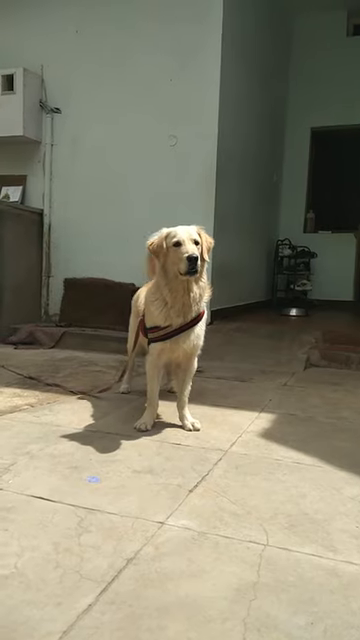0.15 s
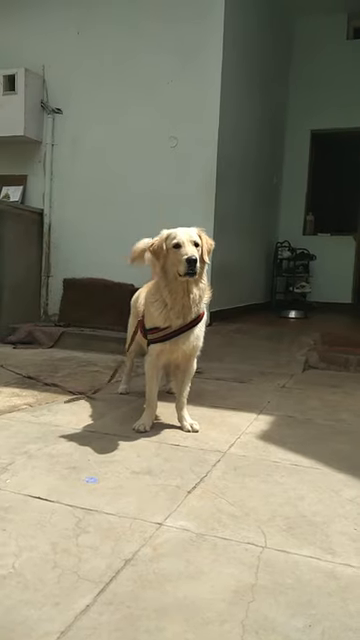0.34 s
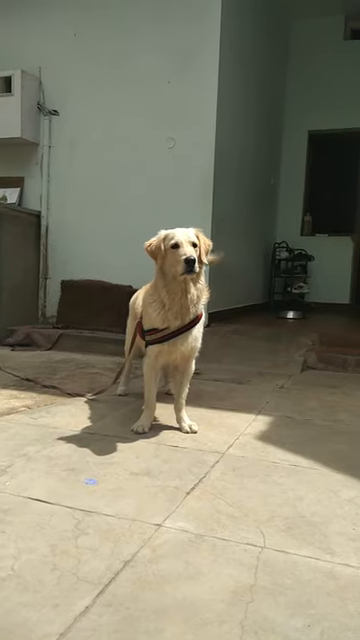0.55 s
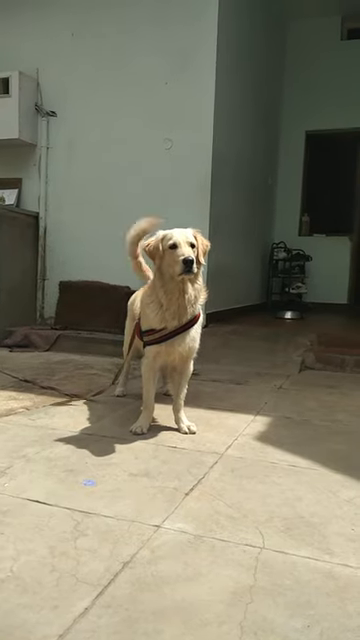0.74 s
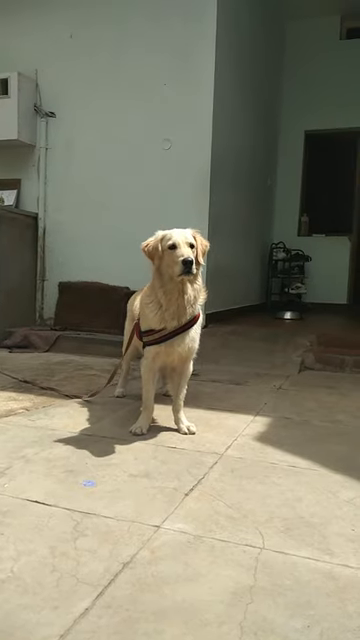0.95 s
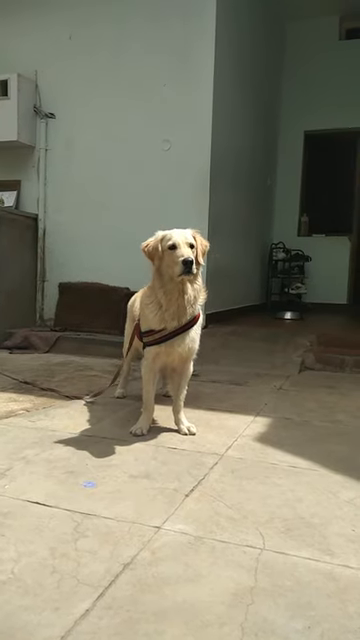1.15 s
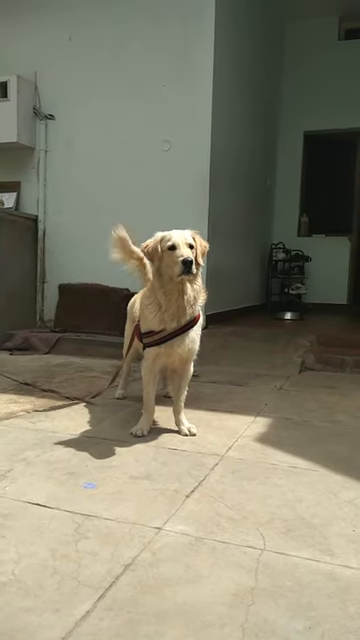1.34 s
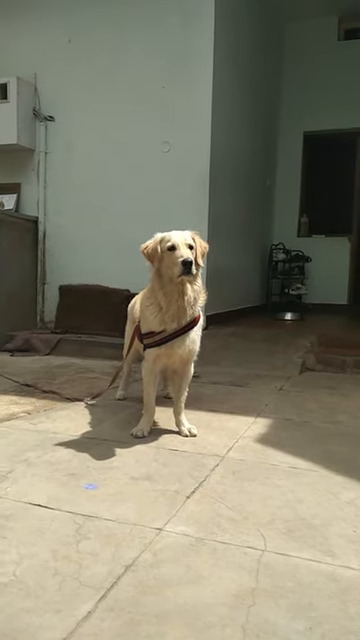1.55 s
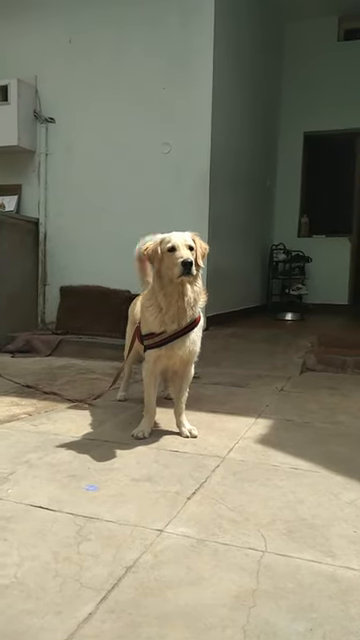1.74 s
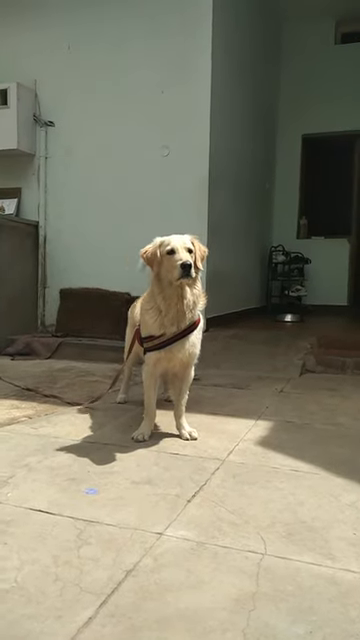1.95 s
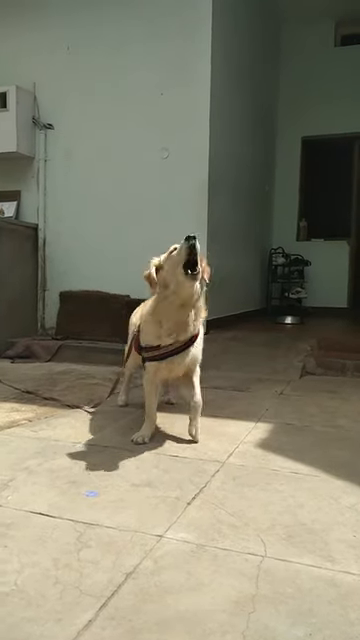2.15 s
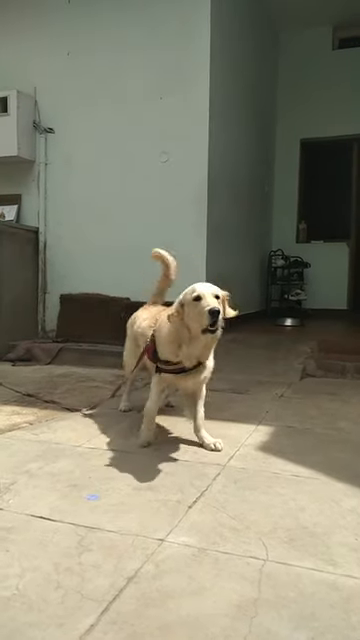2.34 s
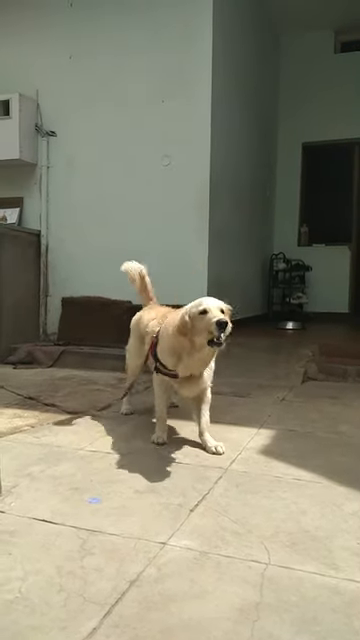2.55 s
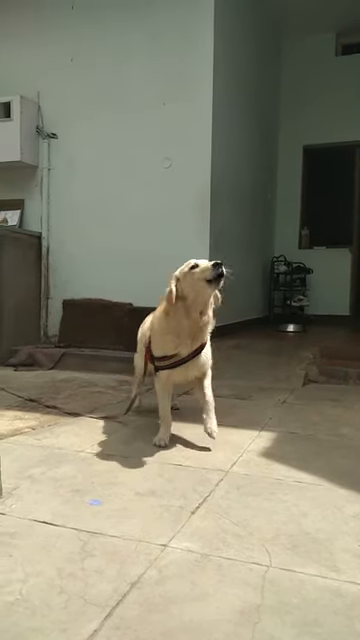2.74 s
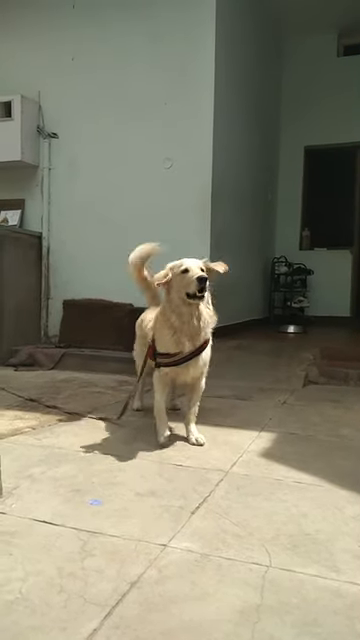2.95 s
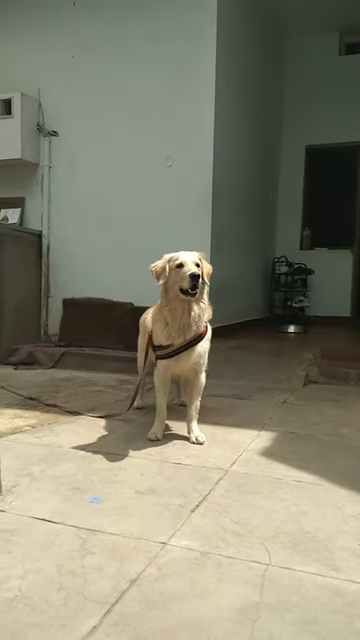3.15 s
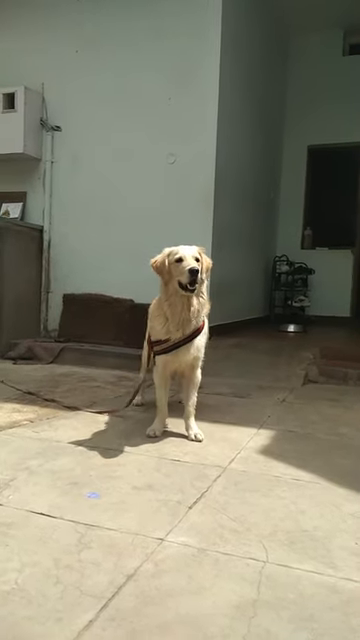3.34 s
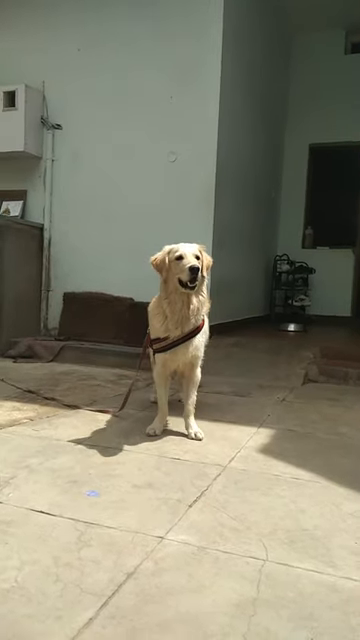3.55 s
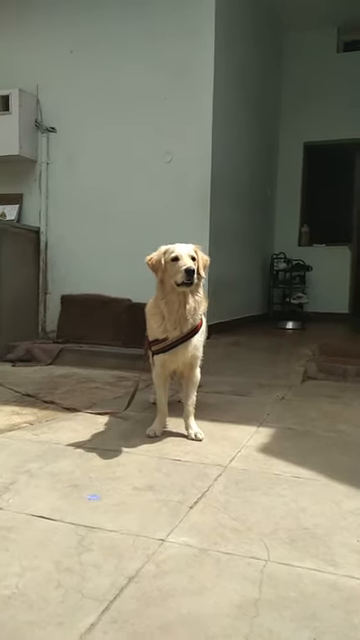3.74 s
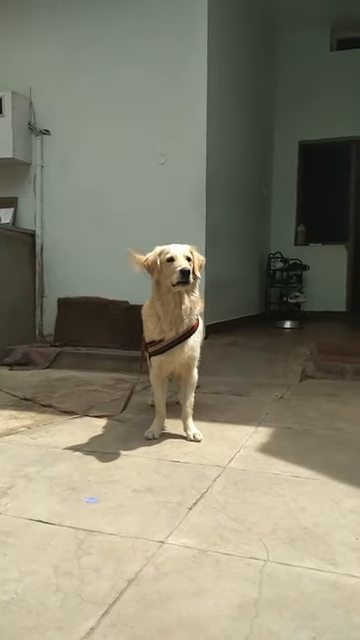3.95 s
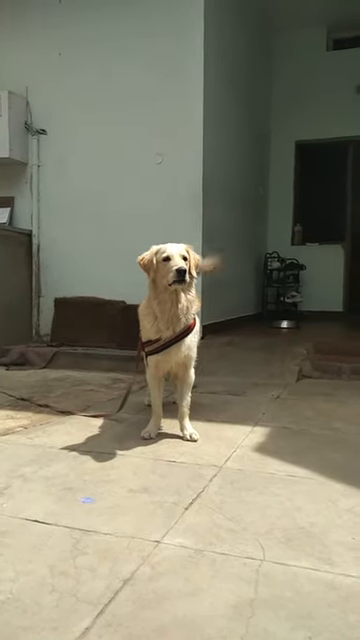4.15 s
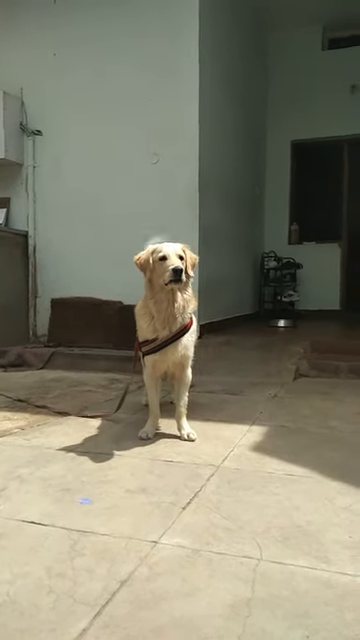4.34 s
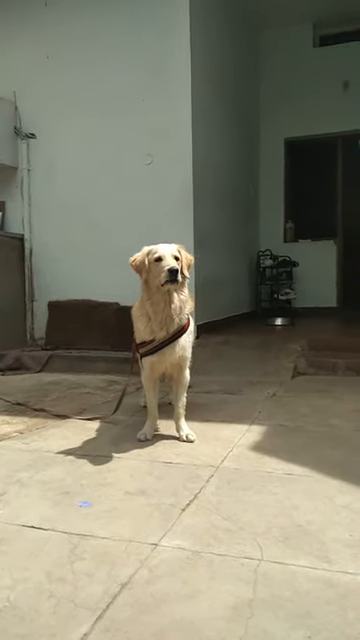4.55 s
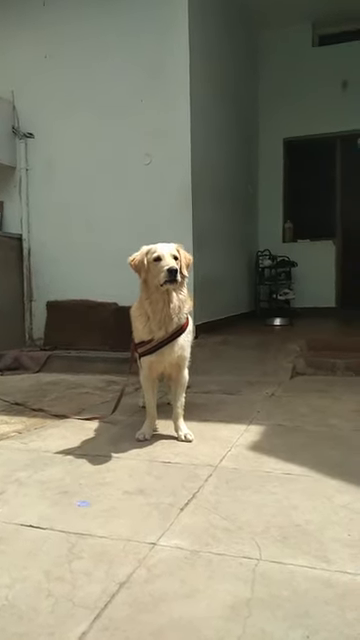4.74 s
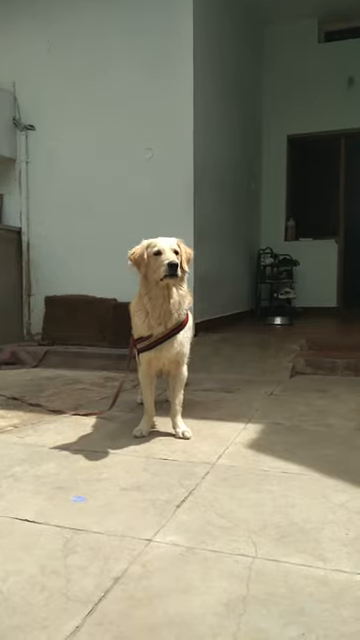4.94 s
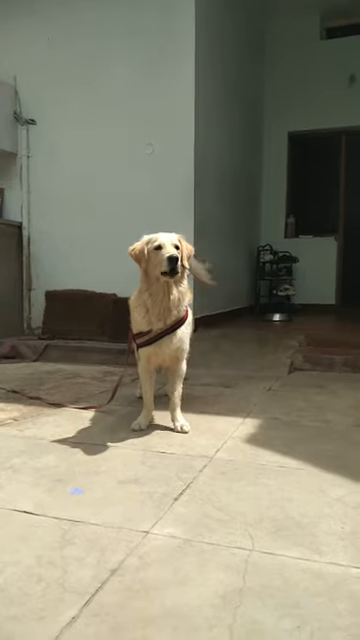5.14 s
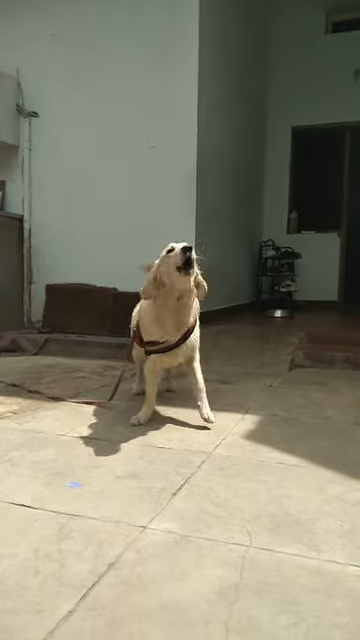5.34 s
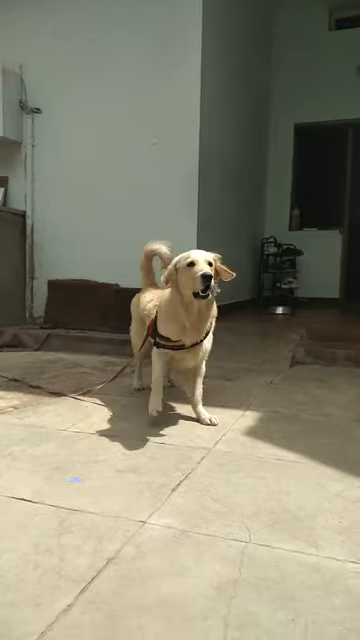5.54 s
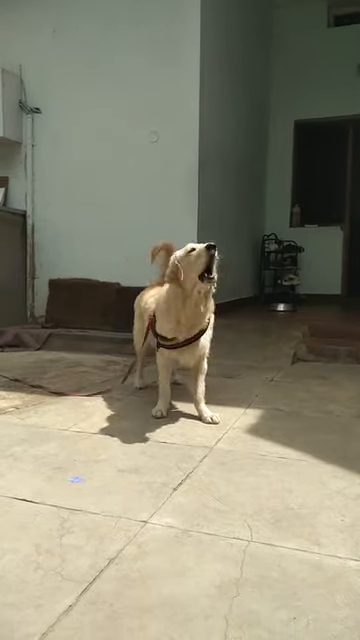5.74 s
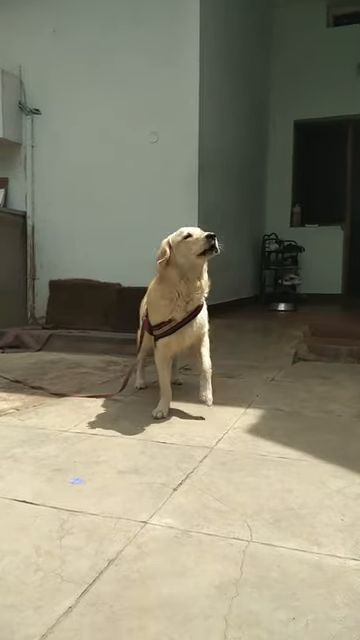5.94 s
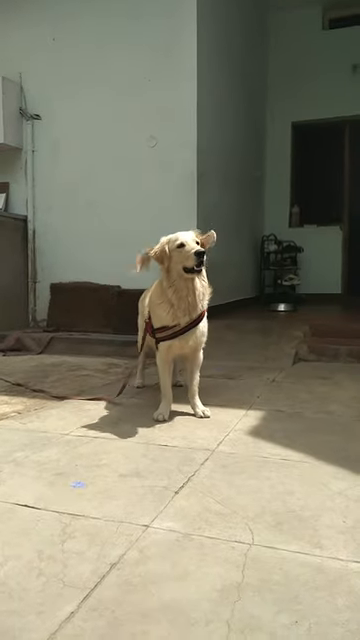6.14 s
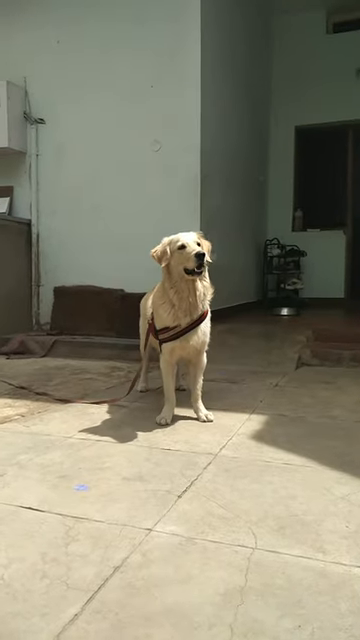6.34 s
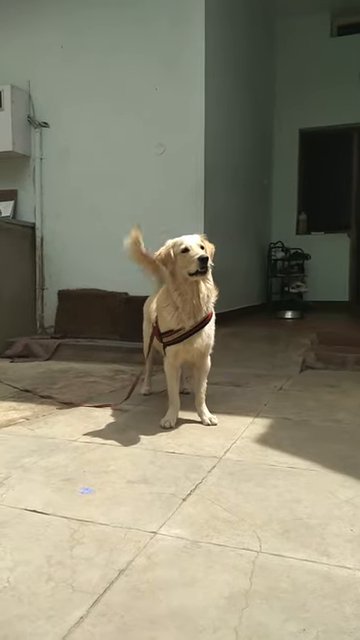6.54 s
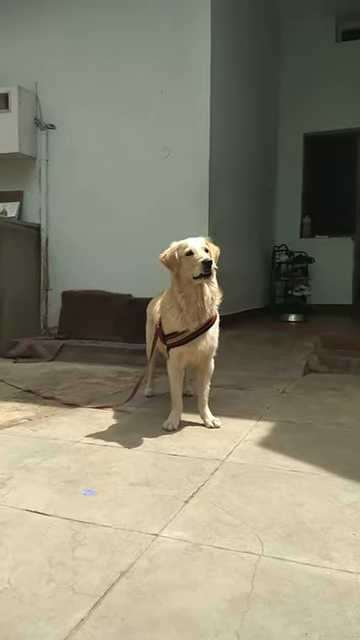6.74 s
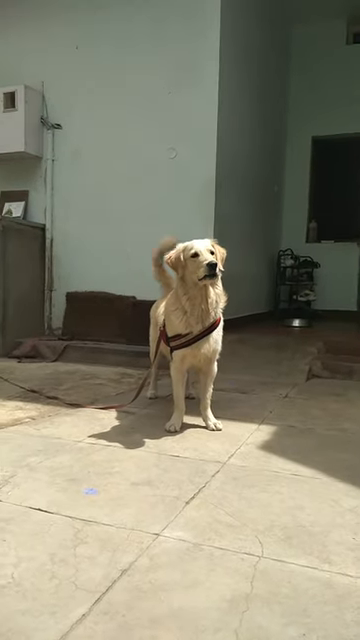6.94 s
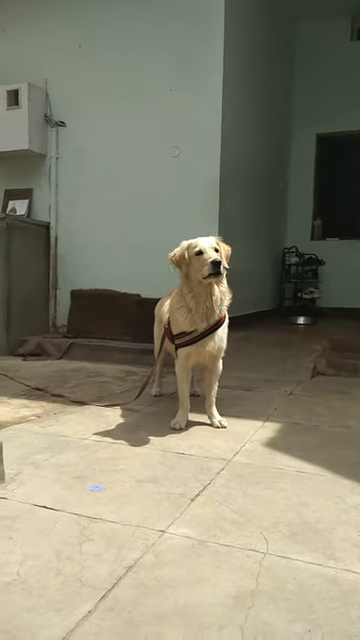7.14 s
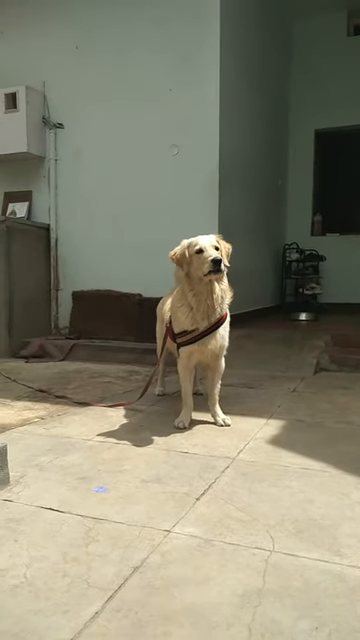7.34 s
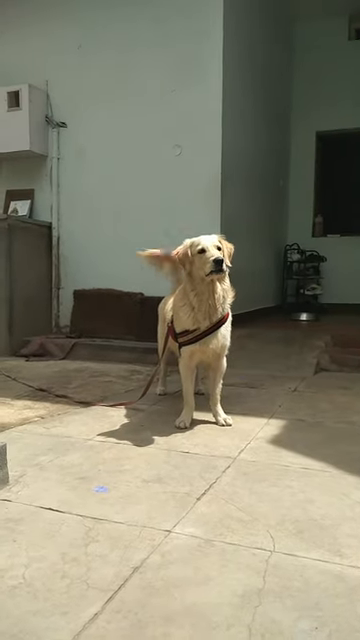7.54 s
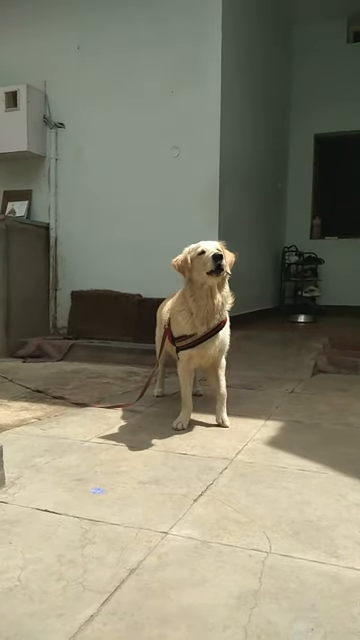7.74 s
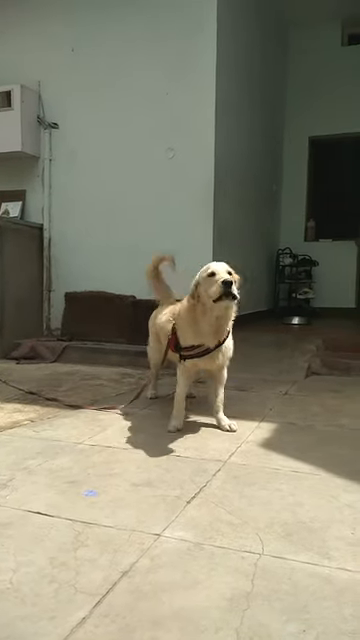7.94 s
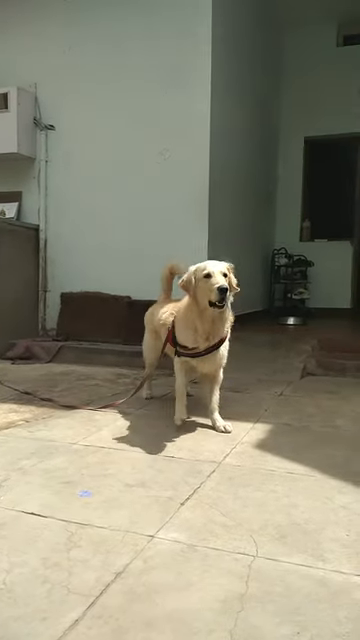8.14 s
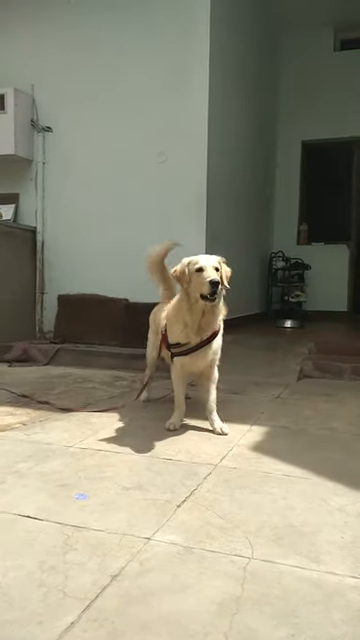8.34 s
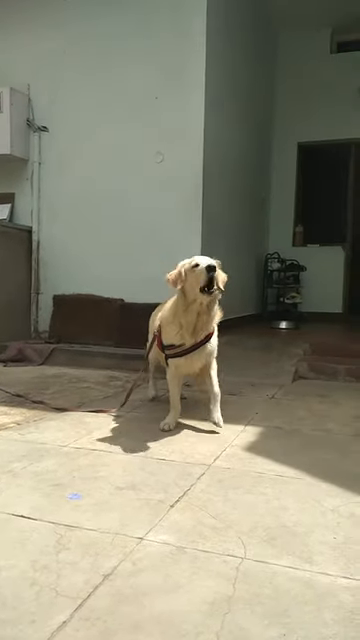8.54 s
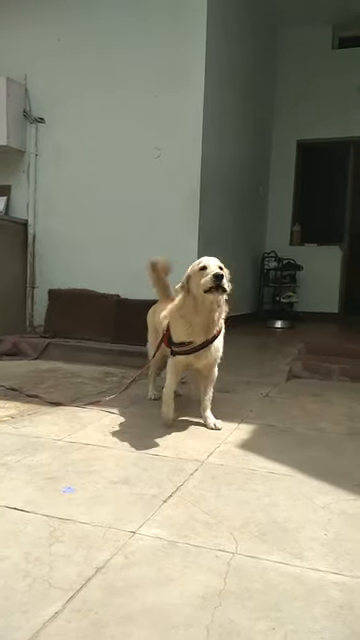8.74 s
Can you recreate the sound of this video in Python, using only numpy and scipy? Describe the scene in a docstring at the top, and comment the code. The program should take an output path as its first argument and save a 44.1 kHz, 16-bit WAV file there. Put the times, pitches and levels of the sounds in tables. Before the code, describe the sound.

Near silence with faint air and distant bird notes, then sudden loud, raspy barks from a big dog: three pairs, the last pair more widely spaced. Each is short, rising in pitch then dropping, followed by hard-wall slap and a fading tail. Breathy nose puffs fill gaps; background air swells slightly near the end. Wide stereo outdoor pickup from a few metres away.

```python
"""Dog barking in a walled courtyard

A large dog a few metres from the microphone barks six times: rough vocal-fold pulses ring its throat.
Between barks it snuffs (noise through nose resonances) and whines thinly (gliding near sines).
Farther off a bird whistles, with soft swishes and a ringing hiss, over low rumble and a wash of air.
Walls add echoes and a tail; the loudest barks just reach the recorder's limiter."""
import sys
import numpy as np
from scipy import signal
from scipy.fft import rfft, irfft, next_fast_len
from scipy.io import wavfile
from scipy.ndimage import uniform_filter1d, minimum_filter1d

SR = 44100
rng = np.random.default_rng(int(sys.argv[2]) if len(sys.argv) > 2 else 0)


def inscribe(sig):
    """Save sig as 16-bit PCM at rate SR to the path in sys.argv[1].

    A 1-D sig is mono; a 2-D sig holds one channel per row.
    Samples are clipped to [-1, 1] before scaling.
    """
    pcm = np.round(np.clip(np.atleast_2d(sig).T, -1, 1) * 32767)
    wavfile.write(sys.argv[1], SR, pcm.astype(np.int16))


N = 387198
TIME = np.arange(N) / SR   # seconds

# every bark starts as a murmur, bursts out, then swells to full level (dB against full level)
MURMUR_DB, BURST_DB, SWELL_S = -33, -9, 0.025
RELEASE_DB_PER_S, RELEASE_S = 431, 0.085
CATCH_SHARE, CATCH_S = 0.75, 0.029   # where in the push the dip comes, and its half width
JAW_SHUT_S = 0.0047   # how quickly the jaw closes
RASP_ONSET_DB, RASP_FADE_DB_PER_S = 5, 76   # the rasp is strongest at the start
RASP_FLICKER_DB = 3   # extra flutter of the resonances that carry the rasp
CLIMB_CURVE = 1.7   # how much the pitch climb flattens towards the end of the push


def bark_gesture(t, attack, length, level_db, first_hz, top_hz, sag, opening, shut_s, rasp_db, dip_db):
    """One push of air: pitch climbs, then sags as the level falls. Gives pitch, level, jaw and rasp."""
    after = np.maximum(t - length, 0)
    climb = 1 - (1 - np.minimum(t / length, 1)) ** CLIMB_CURVE
    pitch = first_hz + (top_hz - first_hz) * climb - sag * after
    burst = (MURMUR_DB - BURST_DB) * (1 - np.minimum(t / attack, 1) ** 2)
    swell = BURST_DB * np.clip(1 - (t - attack) / SWELL_S, 0, 1)
    # the level dips once as the throat catches
    catch = np.exp(-((t - CATCH_SHARE * length) / CATCH_S) ** 2)
    level = level_db + burst + swell - dip_db * catch - RELEASE_DB_PER_S * after
    jaw = opening * .5 * (1 - np.tanh((t - shut_s) / JAW_SHUT_S))
    rasp = rasp_db + RASP_ONSET_DB - RASP_FADE_DB_PER_S * t
    return np.maximum(pitch, first_hz / 2), level, jaw, rasp


# throat and mouth resonances, two passes each: centre_hz, width_hz (per pass), jaw_shut_db,
# jaw_open_db (added in proportion to the opening), rasp_share
THROAT_RESONANCES = [(507.4, 170, 13, -20, 0.12), (805, 200, -6.5, 10, 0.017),
                     (1288, 120, -16, 12.5, 0.039), (1653, 340, -24.5, 7.5, 1), (2205, 260, -25, 3, 0.97),
                     (2824, 820, -28, 1.5, 0), (4080, 820, -30, -0.5, 0.0021), (5064, 710, -27, -2, 1),
                     (6310, 980, -25.5, 2, 0.33)]


def throat(source, jaw, rasp_db, patchy_db=3.0):
    """Throat and mouth ring to the source; an opening jaw shifts weight between the resonances."""
    voice = 0
    for k, (hz, width, shut_db, open_db, share) in enumerate(THROAT_RESONANCES):
        ringing = steady(resonate_twice(source, hz, width), size=800)
        flutter_db = (patchy_db + share * RASP_FLICKER_DB) * wobble(90, len(source))
        gain = from_db(shut_db + open_db * jaw + share * rasp_db + flutter_db)
        voice = voice + (-1) ** k * ringing * gain
    return voice


def bark(row, low_hz=300, core_db=-5.0, chest_db=-35, chest_hz=190):
    """Uneven vocal-fold pulses and pulsed turbulence ring the throat, with a clear core and a chest thud."""
    start, attack, length = row[:3]
    at = span(start, start + length + RELEASE_S)
    size = len(at)
    pitch, level_db, jaw, rasp_db = bark_gesture(TIME[at] - start, *row[1:])
    rough = from_db(np.clip(rasp_db, -6, 6) / 2)   # a pressed voice is also less regular
    jitter = .028 * wobble(120, size) + .022 * rough * wobble(400, size)
    cycles = np.cumsum(pitch * (1 + jitter)) / SR
    closures = np.diff(np.floor(cycles), prepend=0) * np.sqrt(SR / pitch)
    # strong and weak pulses alternate, which puts half lines between the harmonics
    alternation = .27 * np.cos(np.pi * np.floor(cycles))
    pulses = closures * (1 + rough * (.3 * wobble(400, size) + alternation))
    turbulence = rms_one(rng.standard_normal(size) * (1 + 0.53 * np.cos(2 * np.pi * cycles)))
    source = pulses + .36 * rough * turbulence + .5 * cut(turbulence, 2600, "high")
    voice = steady(throat(source, jaw, rasp_db), size=400)
    # the clear core of the voice: the fundamental with the jaw shut, the octave with it open
    core = (1 - jaw) ** 3 * np.sin(2 * np.pi * cycles) + jaw ** 2 * np.sin(4 * np.pi * cycles)
    core = core * from_db(3 * wobble(170, size)) / rough
    voice = cut(voice + from_db(core_db) * core, low_hz, "high", order=4)
    # the chest adds a weak low thud
    voice = voice + from_db(chest_db) * rms_one(resonate_twice(turbulence, chest_hz, 180))
    out = np.zeros(N)
    out[at] = steady(voice, size=400) * from_db(level_db)
    return out


# six barks: start_s, attack_s, push_s (length of the push), level_db (before placing), first_pitch_hz,
# top_pitch_hz (before the sag), sag_hz_per_s (after the push), jaw_opening (0-1),
# jaw_shuts_s (after the start), rasp_db (before its onset and fade), dip_db (late in the push)
BARK_EVENTS = [(2.216, 0.023, .135, -7, 205.1, 480.9, 250, 0.6, .095, 1.5, 2.5),
               (2.714, 0.018, .13, -6.5, 214.8, 470.3, 608, .62, 0.13, 3.5, 8),
               (5.346, .022, 0.085, -3, 269.3, 398.5, 1496, .75, .11, 3, 5.5),
               (5.853, 0.019, .117, -7, 256.5, 374.2, 1800, .68, 0.16, 5, 7.5),
               (7.868, .025, .106, -7, 269.2, 413.6, 2000, 0.8, .118, 1.5, 5.5),
               (8.656, 0.03, 0.11, -9.5, 254, 383.7, 1500, .58, 0.18, 3.5, 2.5)]


def barks():
    """The dog's six pushes of voice, dry."""
    return sum(bark(row) for row in BARK_EVENTS)


# nose and throat resonances in a snuff, two passes each: centre_hz, width_hz (per pass), level_db,
# throat_share (of the throatiness)
NOSE_RESONANCES = [(457, 250, -14.5, 0.94), (1020, 130, 3, 1.2), (1176, 120, 0.5, 0.73),
                   (1920, 150, -1.5, .7), (2420, 310, 0, 0.087), (3660, 1400, -4, 0.064),
                   (4430, 350, -6, 1), (5670, 620, -4.5, 0.079), (6700, 230, -8.5, 0)]
# snuffs and gasps: start_s, length_s (until the flow has halved), level_db (at full flow, before placing),
# throatiness_db
SNUFF_EVENTS = [(2.15, 0.094, -57, -1.5), (2.521, 0.14, -52, -4), (2.928, 0.08, -43.5, 8.5),
                (3.081, 0.14, -57.5, 1), (3.321, .18, -53.5, 7.5), (5.266, .052, -39.5, -1.5),
                (5.638, 0.19, -49.5, -9.5), (6.07, 0.051, -45.5, 6), (6.211, 0.15, -59, 3),
                (7.786, 0.083, -52, -0.5), (8.054, 0.073, -44.5, -18), (8.23, 0.19, -48.5, -3.5)]
SNUFF_ATTACK_SHARE = .15   # part of the length over which the flow builds up
SNUFF_RELEASE_S = 0.029   # how quickly the flow ebbs


def snuffs(flutter_hz=50):
    """Air rushes through the dog's nose and throat, flapping the soft palate unevenly, and ebbs away."""
    out = np.zeros(N)
    for start, length, level_db, throat_db in SNUFF_EVENTS:
        at = span(start, start + 2 * length)
        t = TIME[at] - start
        flaps = np.cumsum(flutter_hz * np.exp(0.36 * wobble(60, len(at)))) / SR % 1
        air = rng.standard_normal(len(at)) * (1 - .5 * flaps) ** 2
        rush = 0
        for hz, width, db, share in NOSE_RESONANCES:
            rush = rush + resonate_twice(air, hz, width) * from_db(db + share * throat_db)
        build_up = np.minimum(t / (SNUFF_ATTACK_SHARE * length), 1)
        ebb = .5 * (1 - np.tanh((t - length) / SNUFF_RELEASE_S))
        out[at] += rms_one(rush) * from_db(level_db) * build_up * ebb
    return out


def whistle(row, waver, flutter_db):
    """A near sine that glides along an arch, swelling or fading and wavering a little."""
    start, length, first_hz, last_hz, arch_hz, level_db, swell_db = row
    at, out = span(start, start + length), np.zeros(N)
    along = np.linspace(0, 1, len(at))
    pitch = first_hz + (last_hz - first_hz) * along + arch_hz * np.sin(np.pi * along)
    phase = 2 * np.pi * np.cumsum(pitch * (1 + waver * wobble(500, len(at)))) / SR
    level = from_db(level_db + swell_db * (along - .5) + flutter_db * wobble(60, len(at)))
    out[at] = np.sqrt(2) * np.sin(phase) * level * signal.windows.tukey(len(at), .15)
    return out


# nasal whines: start_s, length_s, first_pitch_hz, last_pitch_hz, arch_hz,
# level_db (mid-note, before placing), swell_db (over the note)
WHINE_NOTES = [(2.417, .29, 2333, 2335, 22, -37, -7.5), (5.618, 0.29, 2318, 2422, 9.3, -39, 7.5)]


def whines():
    """Thin, almost steady tones through the dog's nose."""
    return sum(whistle(row, waver=.002, flutter_db=1.5) for row in WHINE_NOTES)


# bird notes: start_s, length_s, first_pitch_hz, last_pitch_hz, arch_hz,
# level_db (mid-note, before placing), swell_db (over the note)
BIRD_NOTES = [(0, 0.069, 1766, 1700, 2, -74, -14), (0.168, 0.047, 1730, 1657, 0, -72, -15),
              (0.598, 0.186, 1524, 1415, -51, -76, -11), (1.262, 0.17, 2296, 2117, 159, -51, 6),
              (3.078, 0.17, 2677, 2827, -330, -50, 0), (3.243, 0.0236, 3125, 3030, 0, -46, 0),
              (3.281, 0.031, 3020, 3530, 8, -49, -11), (3.274, 0.165, 2600, 2690, -54.5, -53, -12),
              (3.456, 0.045, 2990, 3556, -150, -48.5, 5), (3.568, 0.089, 2745, 2298, -200, -57, -6),
              (3.701, 0.11, 2440, 2792, 57.5, -46.5, 5), (3.737, 0.026, 3060, 3140, 0, -46, 0),
              (3.776, 0.033, 2860, 3510, 8, -42, -8), (1.92, .21, 4196, 4208, -0.5, -84, -1.5),
              (6.527, 0.086, 2052, 2080, 90, -58.5, -1)]


def bird():
    """Gliding whistles that grow hoarser, their pitch less steady, the higher they climb."""
    out = 0
    for row in BIRD_NOTES:
        hoarseness = 0.014 * (max(row[2:4]) / 2400) ** 3
        out = out + whistle(row, waver=hoarseness, flutter_db=3.5)
    return out


# soft far swishes: start_s, level_db (before placing)
SWISH_EVENTS = [(1.44, -61.5), (4.018, -53)]
# their spectrum: frequency_hz, level_db (relative)
SWISH_SPECTRUM = [(800, -18), (2500, 1.5), (4500, 3.5), (7000, -5), (10000, -34.5)]


def swishes(length_s=0.07):
    """Short puffs of coloured noise that rise and fall smoothly."""
    out = np.zeros(N)
    for start, level_db in SWISH_EVENTS:
        at = span(start, start + length_s)
        out[at] += from_db(level_db) * noise(SWISH_SPECTRUM, len(at)) * signal.windows.tukey(len(at), .5)
    return out


# swells of faint hiss: start_s, length_s, level_db (before placing)
HISS_SWELLS = [(7.412, 0.23, -51.5), (7.577, .19, -52)]
# its resonances: centre_hz, width_hz, level_db (relative)
HISS_RESONANCES = [(3063, 17.6, 6), (3470, 17, -2.5), (2630, 46, -14), (1300, 1800, -23.5),
                   (4500, 2800, -48)]


def ringing_hiss(fade_share=0.42, top_hz=6500):
    """White noise through very narrow resonances, so that a thin ring sounds in the hiss."""
    white, out = rng.standard_normal(N), np.zeros(N)
    tones = sum(from_db(db) * resonate(white, hz, width) for hz, width, db in HISS_RESONANCES)
    ringing = rms_one(cut(tones, top_hz, "low"))
    for start, length, level_db in HISS_SWELLS:
        at = span(start, start + length)
        out[at] += from_db(level_db) * ringing[at] * signal.windows.tukey(len(at), fade_share)
    return out


# spectra of the outdoor rumble and the wash of air: frequency_hz, level_db (relative)
RUMBLE_SPECTRUM = [(15, -49), (25, -26.5), (42, -13), (65, -1), (98, -4.5), (186, -4), (271, -8.5),
                   (331, -22.5), (464, -35), (500, -33), (650, -61.5), (1100, -120)]
AIR_SPECTRUM = [(240, -35.5), (400, -4), (723, -11), (1050, -1), (1260, -8.5), (1680, -3.5), (1880, -10),
                (2250, -5.5), (2510, -16), (3040, -7.5), (3470, -10.5), (5760, -16.5), (7160, -25),
                (9310, -51.5), (15800, -120)]
# course of the background: time_s, rumble_db (before its flutter), air_db
BACKGROUND_LEVELS = [(0, -65.5, -71.5), (1, -66.5, -75.5), (2, -68, -76), (3.2, -61, -67.5),
                     (4.5, -70, -74), (5.2, -59.5, -73), (6.5, -58.5, -68), (7.4, -57.5, -65),
                     (8.2, -50.5, -56.5), (8.78, -59, -70)]


def wide_noise(spectrum, side):
    """Coloured stereo noise; `side` is the share that differs between the ports."""
    return rms_one(noise(spectrum, N) + side * noise(spectrum, N) * [[1], [-1]])


def background():
    """Low outdoor rumble, nearly alike at both ports, and a faint wide wash of air."""
    rumble_db, air_db = in_time(BACKGROUND_LEVELS, TIME)
    rumble = wide_noise(RUMBLE_SPECTRUM, .35)
    air = wide_noise(AIR_SPECTRUM, .8)
    return from_db(rumble_db + 2.3 * wobble(12, N)) * rumble + from_db(air_db) * air


# first echoes off steps and walls: left_delay_s, right_delay_s, level_db
EARLY_REFLECTIONS = [(.0055, 0.0036, -19.5), (.0077, .0076, -24), (.0086, .0098, -18), (0.0131, 0.018, -22),
                     (0.0188, .0188, -22), (.0294, .0302, -14)]


def first_echoes(x):
    """A few distinct reflections, timed differently at each port; small surfaces return little bass."""
    x = cut(x, 300, "high")
    out = np.zeros((2, N))
    for left_s, right_s, db in EARLY_REFLECTIONS:
        delayed = [np.interp(TIME - s, TIME, x, left=0) for s in (left_s, right_s)]
        out += from_db(db) * np.array(delayed)
    return out


# courtyard decay: frequency_hz, near_walls_t60_s, tail_t60_s
YARD_DECAY = [(197, 0.69, 1), (506, 0.2, 0.27), (1380, 0.15, 0.83), (2500, 0.12, 0.52), (6110, 0.09, 0.72),
              (12000, 0.48, 0.44)]


def courtyard(gap_s=0.0061, tail_db=-14.0, alike_hz=600):
    """Stereo echo of the walls: an early decay plus a long tail, alike at both ports in the bass."""
    t = np.arange(SR) / SR
    edges, out = np.geomspace(100, 16000, num=12), 0
    white = rng.standard_normal((2, 2, SR))
    onset = np.clip(t / gap_s - 1, 0, 1)   # silent for the gap, then rising over as long again
    for k, (low, high) in enumerate(zip(edges, edges[1:])):
        hz = np.sqrt(low * high)
        mid, side = cut(white[k % 2], [low, high], "band")
        alike = .95 / (1 + (hz / alike_hz) ** 2)
        stereo = np.sqrt(1 + alike) * mid + np.sqrt(1 - alike) * side * [[1], [-1]]
        early = from_db(-60 * t / at_hz(YARD_DECAY, hz))
        tail = from_db(tail_db - 60 * t / at_hz(YARD_DECAY, hz, axis=2))
        # each band carries energy in proportion to its width
        out = out + rms_one(stereo * (early + tail) * onset) * np.sqrt(2 * (high - low)) / SR
    return out


def place(x, walls, direct_db, echo_db):
    """Direct sound plus the walls' diffuse answer."""
    return from_db(direct_db) * x + from_db(echo_db) * signal.fftconvolve(x[None], walls, axes=1)[:, :N]


# the two microphone ports: frequency_hz, left_minus_right_db, left_lead_rad
PORT_DIFFERENCES = [(100, 0.5, 4.86), (290, 1.5, -1.73), (450, -1, 1.44), (600, -1, 0.98),
                    (776.2, -1.5, 1.05), (1030, 0.5, 1.03), (1260, 4.5, -1.47), (1580, -4, 2.1),
                    (1720, 2, 1.43), (2200, 4, -1.9), (2830, 4, -1), (3990, 7, -2), (5400, 9, -1),
                    (6723, 4.5, -1.5)]


def ports(x):
    """The recorder's body and the ground colour and delay each side differently."""
    size = next_fast_len(N + SR // 10)
    hz = np.arange(size // 2 + 1) * SR / size
    lead = at_hz(PORT_DIFFERENCES, hz, axis=2)
    half = from_db(at_hz(PORT_DIFFERENCES, hz) / 2) * np.exp(.5j * lead)   # each side takes half
    return irfft(rfft(x, size) * np.array([half, 1 / half]), size)[:, :N]


def from_db(db):
    """Decibels to gain."""
    return 10 ** (np.asarray(db) / 20)


def rms_one(x):
    """Scale to rms 1."""
    return x / np.sqrt(np.mean(x ** 2) + 1e-20)


def steady(x, size):
    """Even out the level over `size` samples."""
    return x / np.sqrt(np.abs(uniform_filter1d(x ** 2, size=size)) + 1e-12)


def in_time(rows, t):
    """The columns of a curve at times t."""
    s, *columns = np.transpose(rows)
    return [np.interp(t, s, c) for c in columns]


def at_hz(points, hz, axis=1):
    """Read one column of a spectrum on a log-frequency axis."""
    points = np.array(points)
    return np.interp(np.log(np.maximum(hz, 1)), np.log(points[:, 0]), points[:, axis])


def span(start, end):
    """Sample indices between two times."""
    return np.arange(max(int(start * SR), 0), min(int(end * SR), N))


def wobble(rate, size):
    """Smooth chance with `rate` random knots a second, spread 1."""
    knots = rng.standard_normal(4096)
    return np.interp(np.arange(size) * rate / SR % 4095, np.arange(4096), knots) * np.sqrt(3 / 2)


def colour(x, spectrum):
    """Give a steady sound a spectrum."""
    size = next_fast_len(x.shape[-1])
    gain = from_db(at_hz(spectrum, np.arange(size // 2 + 1) * SR / size))
    return irfft(rfft(x, size) * gain, size)[..., :x.shape[-1]]


def noise(spectrum, size):
    """Coloured noise, rms 1."""
    return rms_one(colour(rng.standard_normal(size), spectrum))


def resonate(x, hz, width):
    """One resonance with gain 1 on top."""
    r = np.exp(-np.pi * width / SR)
    feedback = [1, -2 * r * np.cos(2 * np.pi * hz / SR), r * r]
    return signal.lfilter(np.array([1, 0, -1]) * (1 - r * r) / 2, feedback, x)


def resonate_twice(x, hz, width):
    """The same resonance two times over, for steeper flanks."""
    return resonate(resonate(x, hz, width), hz, width)


def cut(x, hz, kind, order=2):
    """Butterworth filter."""
    return signal.sosfilt(signal.butter(order, hz, kind, fs=SR, output="sos"), x)


def scene():
    """The dog a few metres away, the bird and small noises far off, the background all round."""
    walls = courtyard()
    voice = barks()
    barking = place(voice, walls, direct_db=2.0, echo_db=-3.5) + first_echoes(voice)
    whining = place(whines(), walls, direct_db=-2.0, echo_db=-13.5)
    snuffing = place(snuffs(), walls, direct_db=0.5, echo_db=-8.5)
    dog = ports(barking + whining + snuffing)
    far_sounds = bird() + swishes() + ringing_hiss()
    far_walls = courtyard(gap_s=0.0031, tail_db=-2.5)
    far = place(far_sounds, far_walls, direct_db=-7.5, echo_db=0.0)
    return dog + far + background()


def record(dry, leak_db=-1.0, edge_hz=7200, cutoff_hz=16000):
    """The microphone's top falls off in a step; a fast limiter holds and rounds peaks; the very top is cut."""
    dull = signal.sosfilt(signal.ellip(8, .5, 60, edge_hz, fs=SR, output="sos"), dry)
    # a band above the edge still gets through
    heard = dull + from_db(leak_db) * cut(dry, [8200, 10800], "band", order=2)
    allowed = 1 / np.maximum(np.abs(heard) / 1.05, 1)
    held = heard * uniform_filter1d(minimum_filter1d(allowed, size=220), size=220)
    rounded = held / (1 + held ** 16) ** (1 / 16)
    ends = signal.windows.tukey(N, .001)   # very short fades at both ends
    return cut(rounded * ends, cutoff_hz, "low", order=12)


dry = scene()
out = record(dry)
inscribe(out)
```